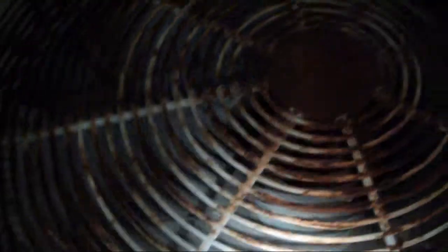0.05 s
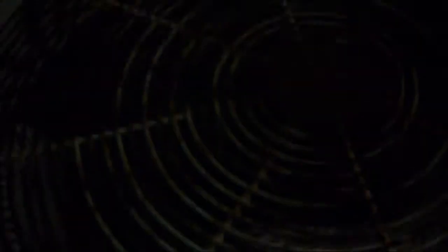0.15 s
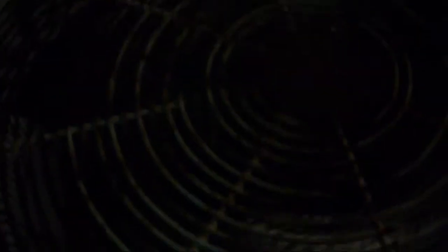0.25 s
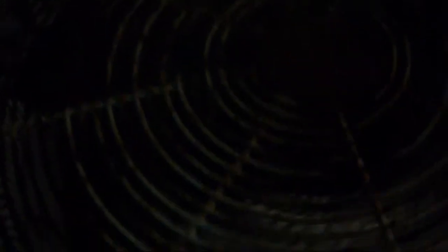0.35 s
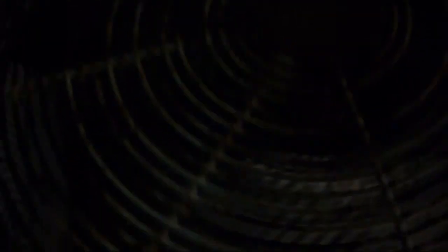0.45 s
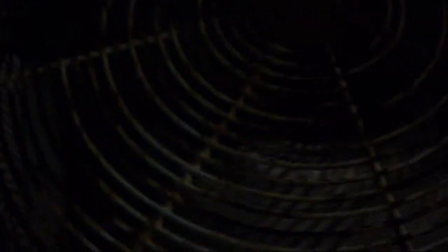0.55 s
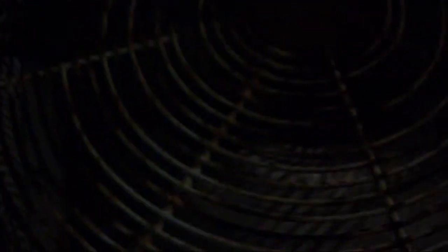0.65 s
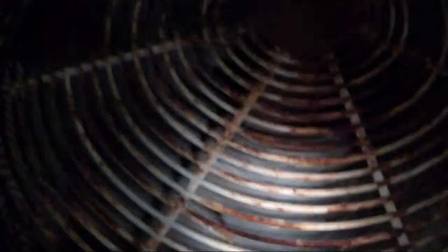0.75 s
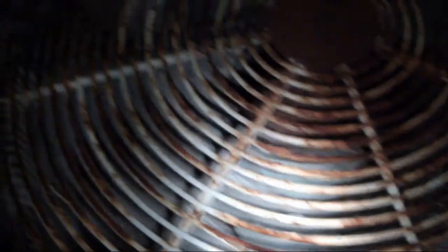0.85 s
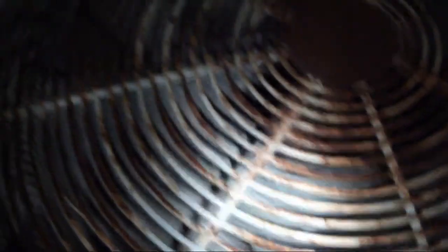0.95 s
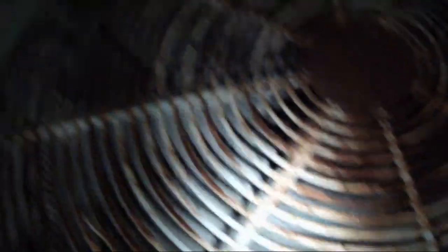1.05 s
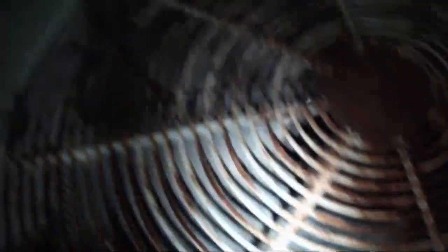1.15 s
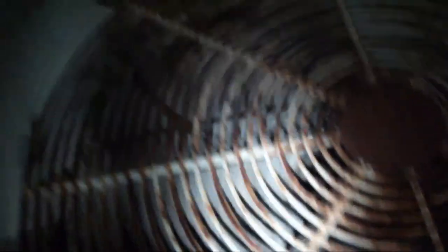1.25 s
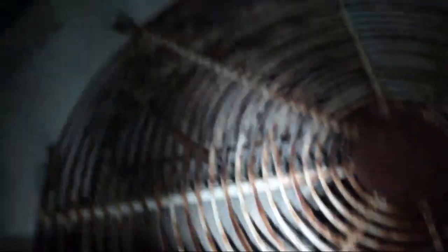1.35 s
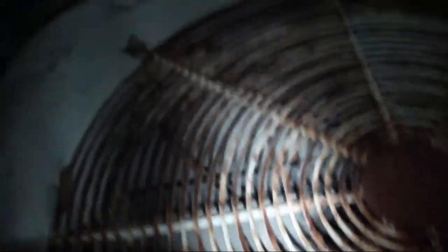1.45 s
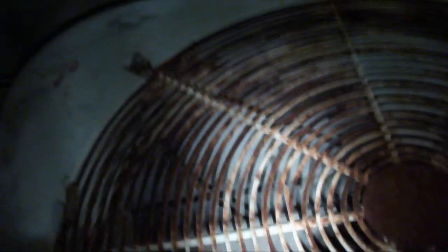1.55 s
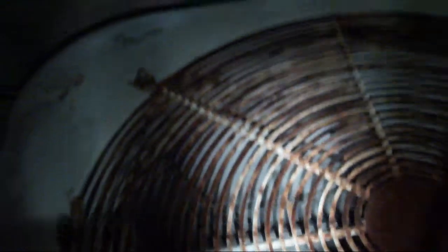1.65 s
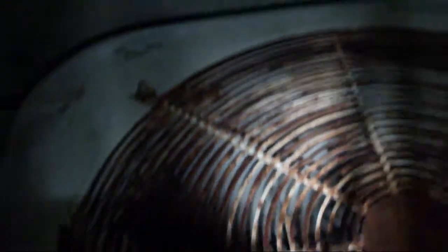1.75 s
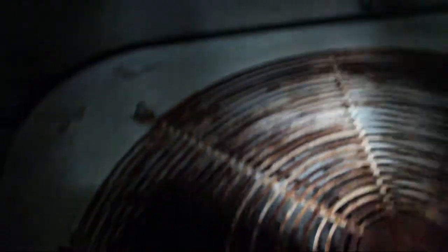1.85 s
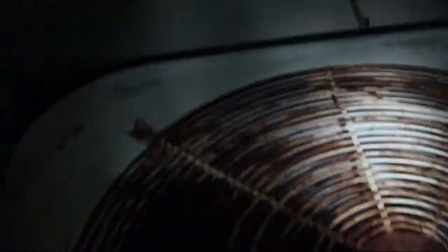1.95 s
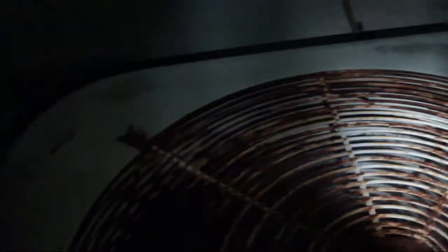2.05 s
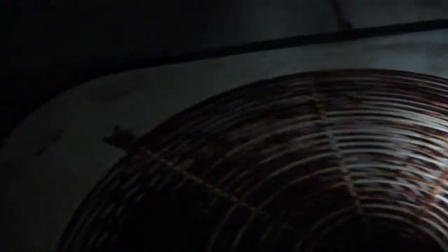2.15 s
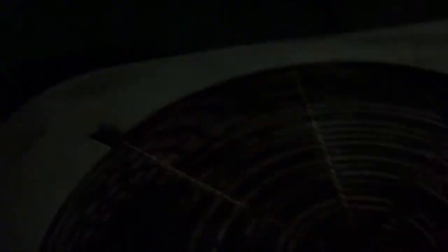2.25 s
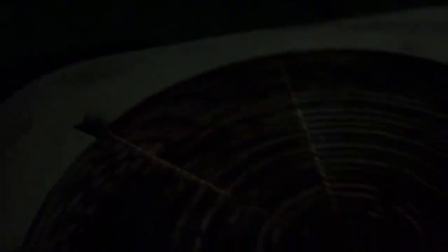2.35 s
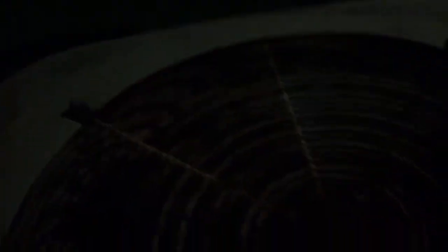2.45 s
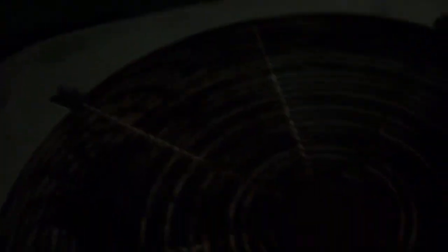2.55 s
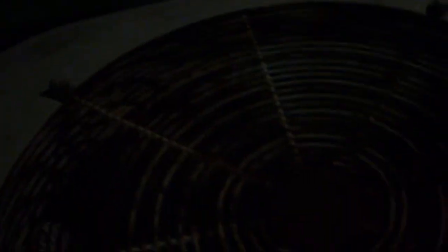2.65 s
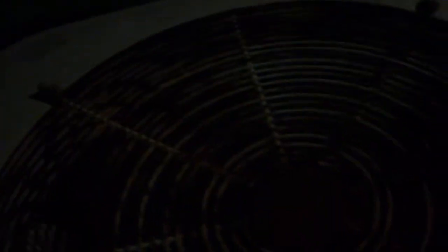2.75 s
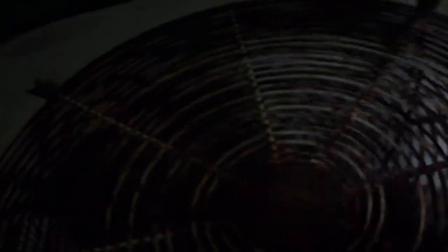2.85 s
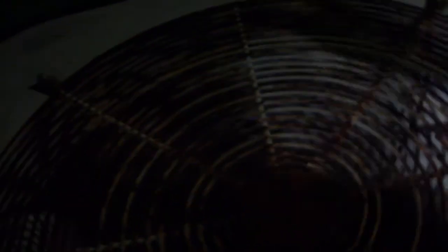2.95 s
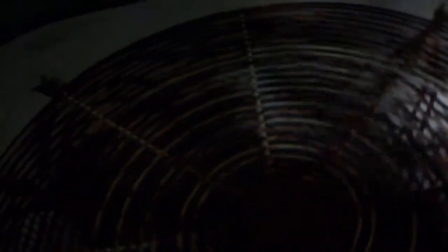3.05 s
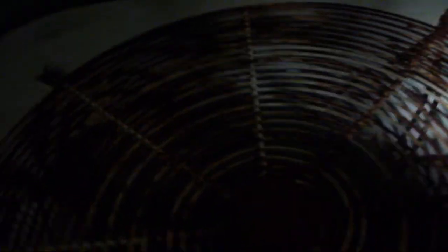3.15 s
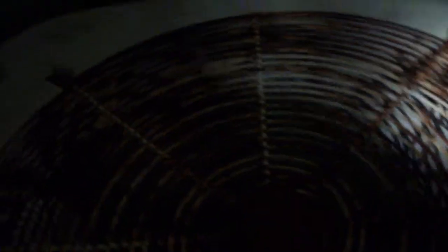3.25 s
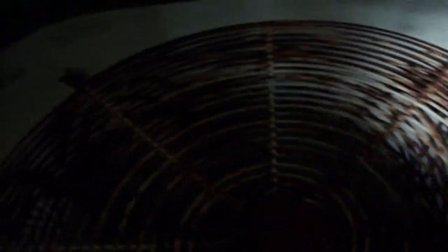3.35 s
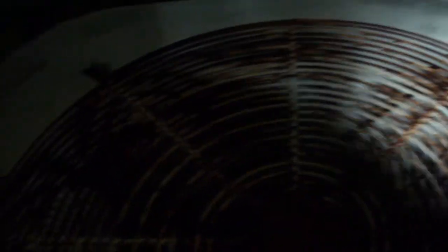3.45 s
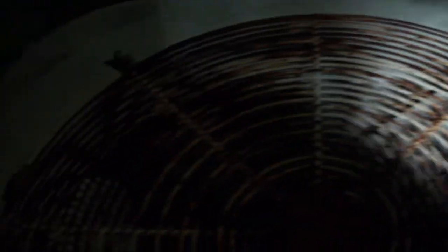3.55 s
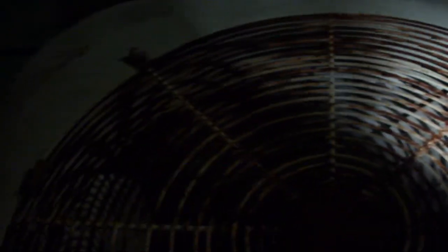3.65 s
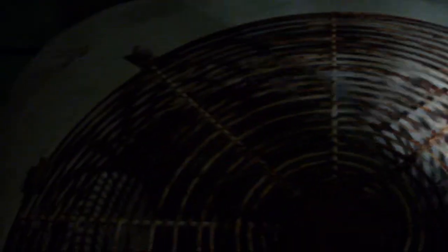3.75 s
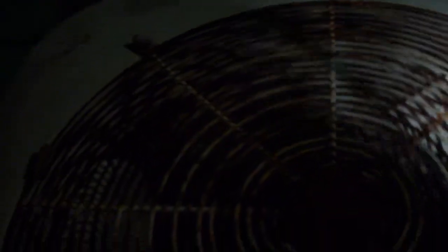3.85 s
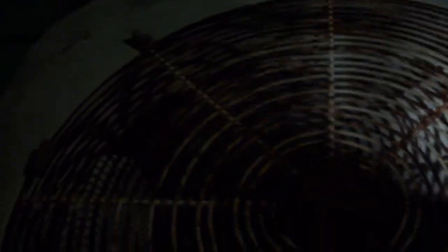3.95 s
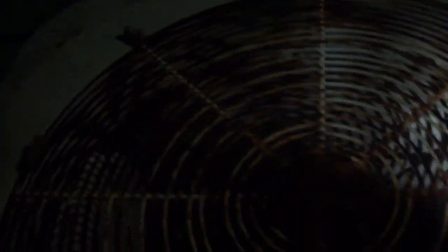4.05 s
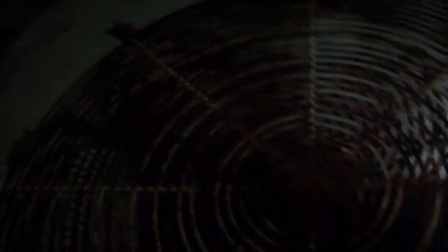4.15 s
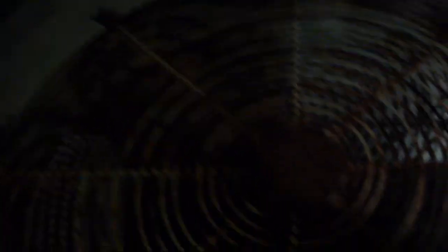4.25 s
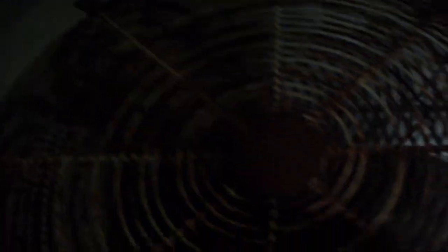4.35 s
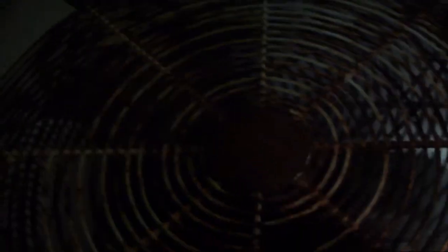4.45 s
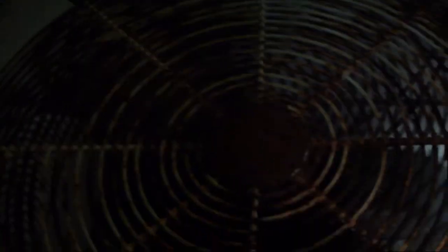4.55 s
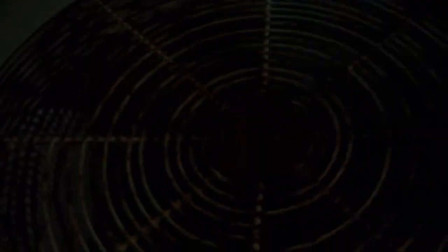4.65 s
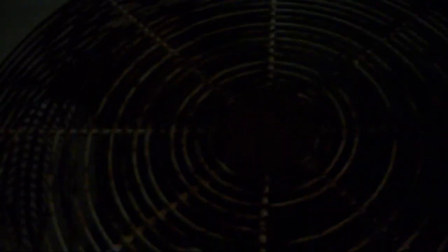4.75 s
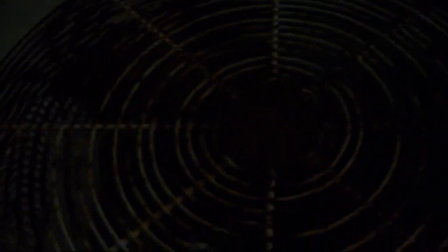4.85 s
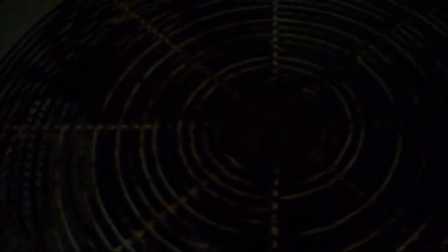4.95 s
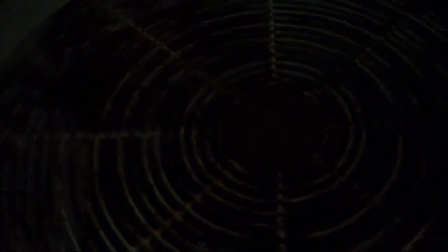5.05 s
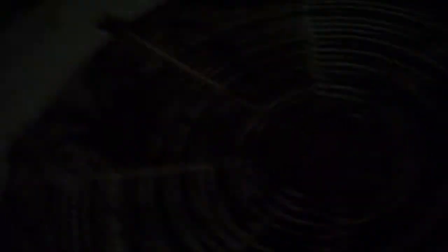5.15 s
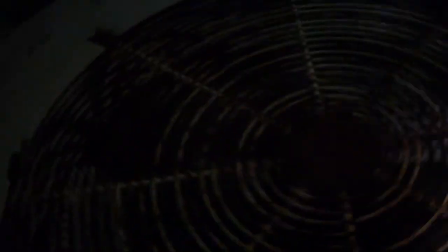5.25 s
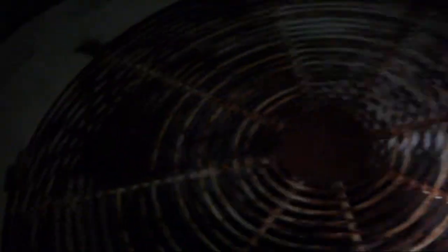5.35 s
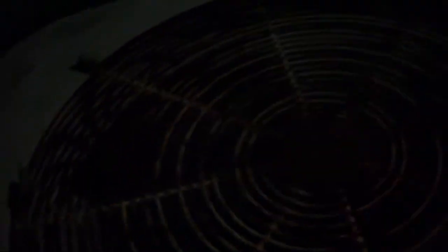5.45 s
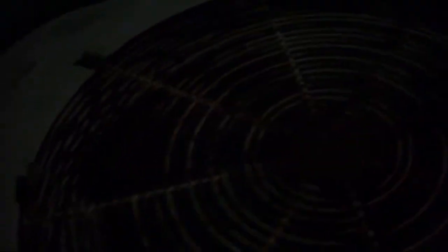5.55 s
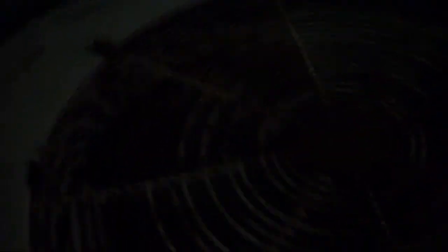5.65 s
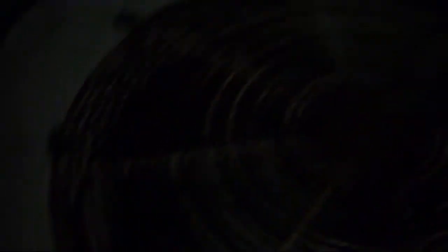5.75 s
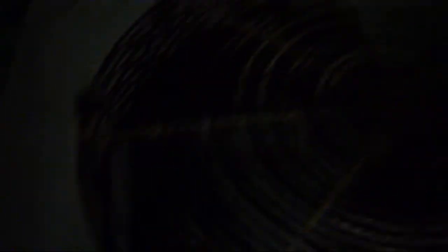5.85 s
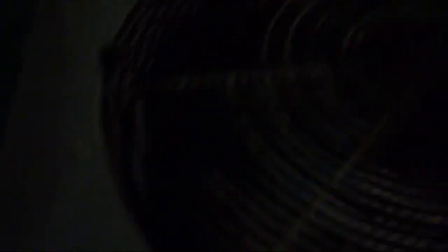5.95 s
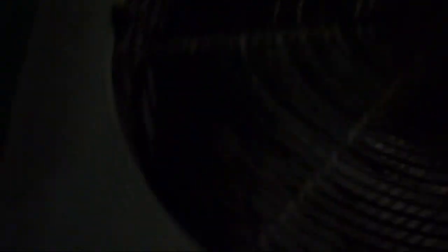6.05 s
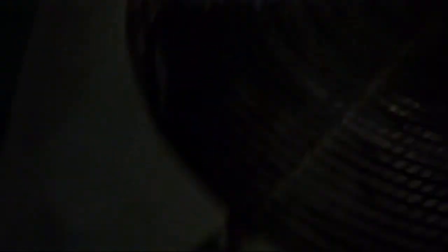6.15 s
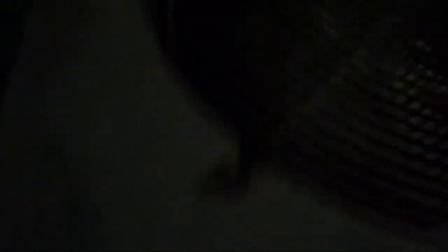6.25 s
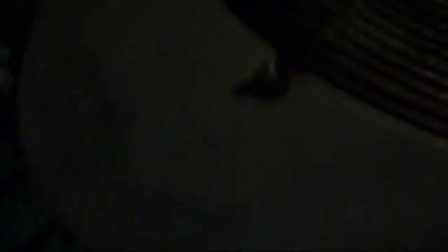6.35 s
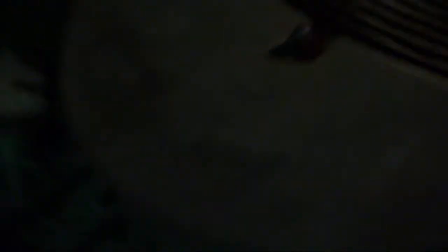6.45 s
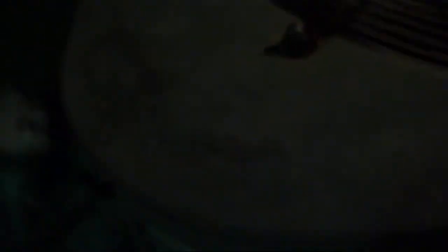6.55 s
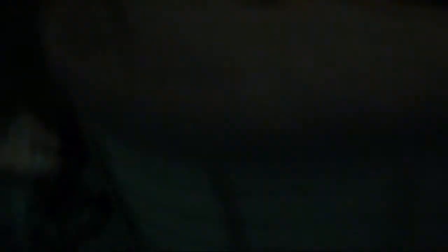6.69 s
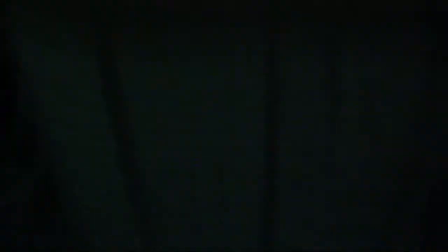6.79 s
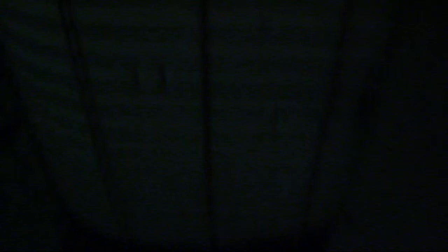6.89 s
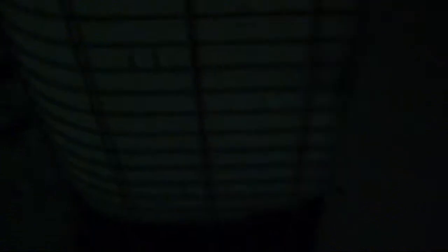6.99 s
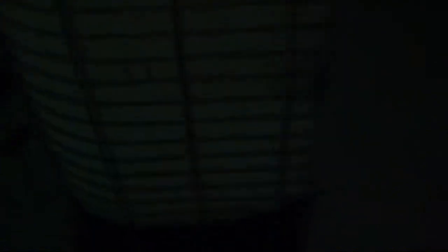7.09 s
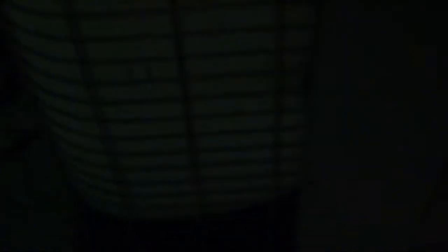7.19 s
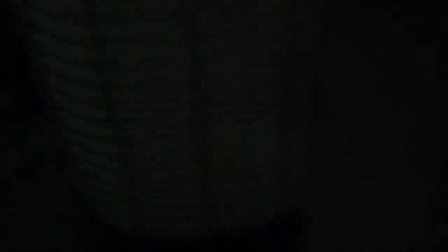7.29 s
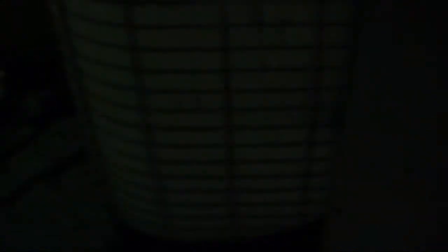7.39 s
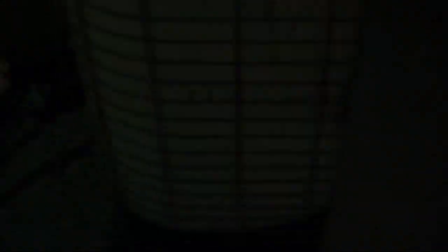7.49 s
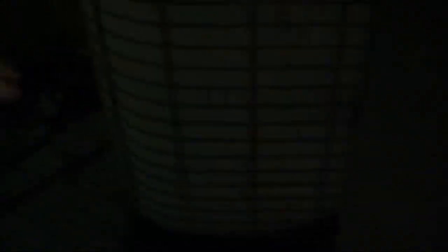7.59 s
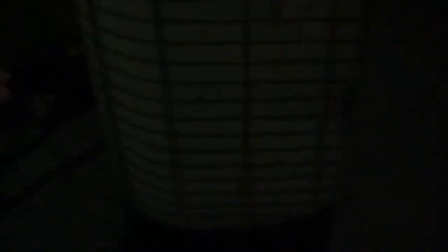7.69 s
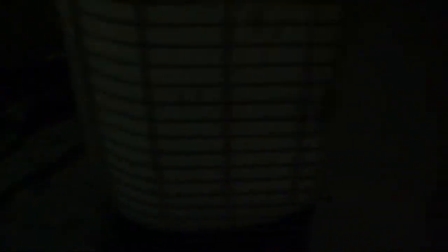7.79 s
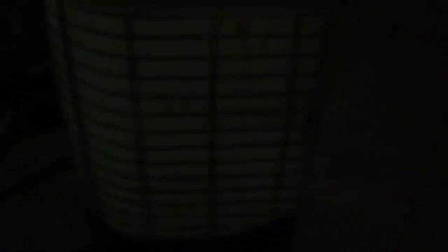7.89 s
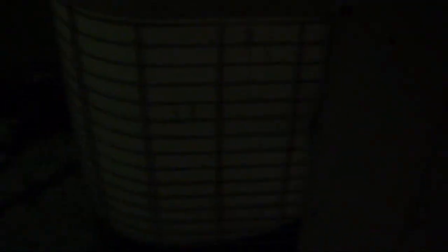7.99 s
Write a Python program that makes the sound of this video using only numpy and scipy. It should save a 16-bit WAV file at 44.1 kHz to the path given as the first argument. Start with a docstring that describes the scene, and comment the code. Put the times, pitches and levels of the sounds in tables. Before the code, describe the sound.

A heat pump runs steadily outdoors, heard just above its fan grille. From 0 to 1.6 s it is closest: deep blade throb at about 29 pulses per second, broad rushing air, and lumpy wind rumble with sharp pops and thumps, thickest between 0.2 and 1.3 s. Small ticks fall near 0.5 and 1.0 s, and a faint high squeak at the start and twice near 2.2 s. From 1.6 to 5.4 s the rush is slightly lower and bursts are sparser, over compressor hum, fine high hiss and thin steady whine. From 5.4 to 6.35 s strong buffeting returns, heaviest around 5.8 and 6.2 s. Then the microphone moves beside the cabinet; by 7 s wind and hiss have dropped, leaving softer throb, low drone and mid-pitched motor tones. Tiny ticks come at 6.7, 6.8 and 7.9 s, soft brushes near 7.5 and 7.6 s. It is still running at 8 s.

```python
"""Outdoors at a heat pump: the microphone is just above its fan grille, then beside the cabinet.
Blade pulses throb in harmonics, noise rushes at the grille, and lumpy rumble and eddy bursts buffet
the microphone until it leaves the stream. Underneath, the compressor hums in tones and droning noise
and hisses in noise with a fine comb. Steady sines whine; chirps squeak, ringing modes tick, and
shaped noise brushes twice near the end."""
import sys
import numpy as np
from scipy import signal
from scipy.fft import rfft, irfft, next_fast_len
from scipy.io import wavfile
from scipy.ndimage import uniform_filter1d, minimum_filter1d

SR = 44100
rng = np.random.default_rng(int(sys.argv[2]) if len(sys.argv) > 2 else 0)


def master(y):
    """Save y as 16-bit WAV."""
    cut = np.clip(np.atleast_2d(y).T, -1, 1)
    pcm = np.round(cut * 32767)  # scale
    wavfile.write(sys.argv[1], SR, pcm.astype(np.int16))


N = 353858

BLADE_HZ, COMPRESSOR_HZ = 28.59, 58.83
LEAVES_S, LEAVING_S = 6.15, 0.21   # centre and time constant of the move beside the cabinet
CUTOFF_HZ = 15200
TIME = np.arange(N) / SR
FREQS = np.arange(N // 2 + 1) * SR / N


def from_db(db):
    """Decibels to amplitude."""
    return 10 ** (np.asarray(db) / 20)


def rms_one(x):
    """Scales a signal to rms 1."""
    return x / np.sqrt(np.mean(x ** 2) + 1e-20)


def in_time(rows):
    """Interpolates each column of a curve, sample by sample."""
    s, *columns = np.transpose(rows)
    return [np.interp(TIME, s, c) for c in columns]


def step(s, taking_s, height=1):
    """A smooth tanh rise from nothing to its height, centred on s."""
    return height * (.5 + .5 * np.tanh((TIME - s) / taking_s))


def swell(s, half_s):
    """A bell-shaped rise and fall of height 1."""
    return np.exp(-np.minimum(((TIME - s) / half_s) ** 2, 50))


def coloured(x, spectrum):
    """Filters a signal with a spectrum joined on a log-frequency axis; rms 1."""
    size = next_fast_len(N)
    hz, db = np.transpose(spectrum)
    bins_hz = np.maximum(np.arange(size // 2 + 1) * SR / size, 1)
    gain = from_db(np.interp(np.log(bins_hz), np.log(hz), db))
    return rms_one(irfft(rfft(x, size) * gain, size)[..., :N])


def drift(rate_hz):
    """Low-passed chance with a spread of 1, made at every 40th sample."""
    r = np.exp(-80 * np.pi * rate_hz / SR)
    white = rng.standard_normal(N // 40 + 2002)
    slow = signal.lfilter([1], [1, -2 * r, r * r], white)[2000:]   # drops the settling
    return np.interp(np.arange(N) / 40, np.arange(len(slow)), rms_one(slow))


def tone(hz):
    """An rms 1 sine that starts anywhere in its cycle."""
    return np.sqrt(2) * np.sin(2 * np.pi * (hz * TIME + rng.random()))


def surge(turn, lag):
    """One short surge for each passing blade."""
    return np.cos(turn + lag) + .6 * np.cos(2 * (turn + lag))


def heard_db(level_db, close_db, screen):
    """A source is louder while the microphone starts close to the wires, and fades once screened."""
    backs_off_s, backing_off_s = 1.6, 0.26
    return level_db + close_db * (1 - step(backs_off_s, backing_off_s)) - step(*screen)


def blades(turn, level_db, waver_db, wander, lag):
    """Each blade sends a pressure wave and a sharper edge pulse; uneven inflow shakes both."""
    # throb before level_db: (time [s], fundamental [dB], octave [dB], third harmonic [dB])
    throb = [(0.2, -13.5, -18.5, -38), (0.6, -14.5, -23.5, -31), (0.92, -14, -15, -23),
             (1.32, -15.5, -18.5, -25.5), (1.8, -20, -18.5, -21), (2.32, -20.5, -19.5, -27.5),
             (2.85, -16.5, -20, -20), (3.15, -16, -18.5, -28.5), (3.6, -17.5, -23.5, -28.5),
             (4.4, -15.5, -19, -23.5), (5.1, -14, -21.5, -30), (5.72, -17.5, -24.5, -27.5),
             (6.0, -12, -18.5, -30), (6.6, -15, -23, -28), (7.1, -19.5, -24, -31.5),
             (7.55, -24.5, -28, -32.5), (7.9, -25, -28.5, -32)]
    # higher overtones: (multiple of blade rate, level against the octave [dB])
    orders = [(4, -9), (5, -20), (6, -24), (7, -20.5), (8, -25.5)]
    fundamental_db, octave_db, third_db = in_time(throb)
    edge = turn + lag + wander * drift(2.0)
    wave = from_db(fundamental_db) * np.cos(turn)
    wave = wave + from_db(octave_db) * np.cos(2 * edge)
    wave = wave + from_db(third_db) * np.cos(3 * edge)
    for k, db in orders:
        # the grille scatters the shortest waves
        scatter = 2 * np.pi * rng.random() * (round(k) > 4)
        overtone_db = octave_db + db + waver_db * drift(3)
        wave = wave + from_db(overtone_db) * np.cos(round(k) * edge + scatter)
    return np.sqrt(2) * from_db(level_db) * wave


def air_stream():
    """Strength in dB of the stream at the microphone: slow changes, gusts and the cabinet's screening."""
    # slow strength before gusts and screening: (time [s], level [dB])
    strength = [(0.0, -25.5), (0.15, -22), (0.69, -22), (1.87, -23.5), (3.4, -25), (4.6, -23.5),
                (5.85, -23), (6.21, -23), (6.75, -28.5), (8.02, -33.5)]
    # gusts: (time [s], half length [s], rise [dB])
    gusts = [(.52, 0.099, 3), (0.772, 0.025, 3), (1.106, 0.064, 3.5), (5.523, 0.057, 4.5),
             (5.744, 0.054, 4), (5.932, 0.036, 1.5), (6.247, 0.03, 7), (6.313, 0.027, 3)]
    # cabinet screening: (time [s], time constant [s], loss [dB])
    wind_screen = (6.55, 0.25, 5)
    gust_db = sum(db * swell(s, half_s) for s, half_s, db in gusts)
    return in_time(strength)[0] + gust_db - step(*wind_screen)


def buffeting(turn, stream_db, level_db, lumpy_db, lumps_per_db, beat_db, sub_db):
    """Turbulence on the microphone: rumble whose upper part is lumpy, rougher in a stronger stream."""
    # turbulence colour: (frequency [Hz], relative density [dB per Hz])
    buffet = [(6, 2), (14, 0.5), (42, 4), (70, 1.5), (100, 1.5), (125, -2), (170, -3), (250, -6),
              (330, -9.5), (500, -10.5), (750, -16), (1100, -20.5), (1800, -28), (2600, -56), (5000, -58.5)]
    excess_db = stream_db - np.median(stream_db)
    air = coloured(rng.standard_normal(N), buffet)
    band = signal.butter(2, [130, 1200], "band", fs=SR, output="sos")
    air /= np.std(signal.sosfilt(band, air))
    large = signal.sosfiltfilt(signal.butter(2, 220, fs=SR, output="sos"), air)
    depth_db = np.clip(lumpy_db + lumps_per_db * excess_db, 0, 4.5)
    chance = np.clip(drift(80), -2.5, 1.8)
    lumps = from_db(depth_db * chance + beat_db * surge(turn, lag=2.5))
    lumps /= np.sqrt(uniform_filter1d(lumps ** 2, size=6000))   # keeps the running level even
    return from_db(level_db + stream_db) * (from_db(sub_db) * large + lumps * (air - large))


def air_rush(turn, beat_db, flutter_db, apart):
    """Air torn by the grille wires: noise swelling a little with each blade."""
    # cabinet screening: (time [s], time constant [s], loss [dB])
    rush_screen = (6.82, 0.084, 5.7)
    # rush colour: (frequency [Hz], relative density [dB per Hz])
    colour = [(150, -10.5), (420, 1.5), (550, -1.5), (740, 0), (1100, -2.5), (1450, -8.5), (1850, -6),
              (2400, -12.5), (2900, -14), (3500, -19.5), (6000, -31.5), (10000, -32.5), (15000, -46)]
    rush_db = heard_db(level_db=-34.0, close_db=2.0, screen=rush_screen)
    white = rng.standard_normal(N) + apart * rng.standard_normal((2, N))
    moving_db = rush_db + beat_db * surge(turn, lag=1.5) + flutter_db * drift(27)
    return from_db(moving_db) * coloured(white, colour)


def compressor_hiss(turn, hiss_db, repeating, beat_db, apart):
    """Gas hiss, part repeating with each stroke as a fine comb of lines; the blades chop it."""
    # hiss colour: (frequency [Hz], relative density [dB per Hz])
    colour = [(2500, -34), (3500, -6), (4000, 1.5), (4500, 1), (5100, -3), (5900, -1), (6450, -1),
              (7100, -1), (7600, -5), (8600, -3), (9700, -10), (10200, -14.5), (11500, -13.5), (15000, -36)]
    period = SR / COMPRESSOR_HZ
    comb = np.zeros(N // 2 + 1, complex)
    lines = np.arange(1, int(period / 2)) * N / period
    comb[np.round(lines).astype(int)] = np.exp(2j * np.pi * rng.random(len(lines)))
    white = rng.standard_normal(N) + repeating * rms_one(irfft(comb, N))
    white = white + apart * rng.standard_normal((2, N))
    return from_db(hiss_db + beat_db * surge(turn, lag=-1.9)) * coloured(white, colour)


def whistles(hiss_db, waver_db):
    """Narrow pipe resonances in the hiss come and go, until the cabinet screens them."""
    # (centre [Hz], width [Hz], mean level against the hiss [dB], middle of fade-out [s])
    resonances = [(4450, 220, -14, 5.9), (6400, 200, -9.5, 5.95), (10200, 250, -17, 6.45)]
    out = 0
    for hz, width_hz, db, until_s in resonances:
        band = signal.lfilter(*signal.iirpeak(hz, hz / width_hz, fs=SR), rng.standard_normal(N))
        band = signal.lfilter(*signal.iirpeak(hz, hz / width_hz / 2, fs=SR), band)
        level = from_db(hiss_db + db + waver_db * drift(3.1))
        out = out + level * (1 - step(until_s, LEAVING_S)) * rms_one(band)
    return out


def compressor_hum(beside, drone_db, waver_db):
    """The cabinet panels drone, and single tones change as the microphone moves round them."""
    # tones before wavering: (frequency [Hz], over the grille [dB], beside the cabinet [dB])
    hum = [(235.3, -39.5, -39.5), (352.9, -51, -47), (1765, -55.5, -64), (2706, -65, -72), (2764, -68, -69),
           (2882, -69, -72), (3882, -70, -78), (4471, -65.5, -80), (4942, -69, -78), (5001, -70, -80),
           (5119, -71, -80), (6357, -64, -80), (6413, -66, -80), (8942, -73, -82), (9236, -74, -82)]
    # the two motor tones: (lower [Hz], upper [Hz])
    motor_hz = (1294, 1333)
    # they trade places as the microphone moves: (time [s], lower level [dB], upper level [dB])
    motor = [(0, -50, -57), (2.8, -52, -52), (4.1, -51, -59), (4.6, -57, -50.5), (6.3, -59, -54),
             (6.75, -60, -50), (6.97, -59, -48.5), (7.15, -52, -51), (7.45, -50.5, -51), (8.02, -53, -53)]
    # panel drone colour: (frequency [Hz], relative density [dB per Hz])
    cabinet = [(30, -12), (70, -1.5), (105, 1.5), (135, -3.5), (170, 0), (205, -3.5), (300, -3.5),
               (360, -18.5), (600, -37), (1500, -32), (2100, -43), (2900, -30.5), (4200, -46)]
    tones = 0
    for hz, over_db, side_db in hum:
        moving_db = over_db + (side_db - over_db) * beside + waver_db * drift(2.6)
        tones = tones + from_db(moving_db) * tone(hz)
    singing = sum(from_db(db) * tone(hz) for hz, db in zip(motor_hz, in_time(motor)))
    drone = from_db(drone_db) * coloured(rng.standard_normal(N), cabinet)
    return tones + singing + drone


def electric_whine():
    """Steady thin electric tones, each a plain sine."""
    # (frequency [Hz], level [dB])
    lines = [(7143, -67), (7197, -67), (7440, -58), (7753, -74), (14880, -63)]
    return sum(from_db(db) * tone(hz) for hz, db in lines)


def squeaks():
    """Brief thin tones that swell and fade."""
    # (time [s], frequency [Hz], half length [s], level [dB])
    chirps = [(0.03, 3900, 0.02, -44.5), (2.19, 4020, .014, -46), (2.265, 4000, .017, -47)]
    return sum(from_db(db) * swell(s, half_s) * tone(hz) for s, hz, half_s, db in chirps)


def small_pops(stream_db, spread_db, count):
    """Weaker eddies come at random and grow with the stream; rows like those of strong eddies."""
    pops_per_s, over_stream_db, swing_s, wake_s = 5, 3, 0.00039, 0.0084
    wait, strength = rng.random((count, 2)).T
    times = np.cumsum(-np.log(1 - wait)) / pops_per_s
    peaks_db = np.interp(times, TIME, stream_db) + over_stream_db + spread_db * (2 * strength - 1)
    return [(s, db, swing_s, db, wake_s) for s, db in zip(times, peaks_db)]


def swing(u):
    """Pressure goes up and then down, to a height of 1."""
    return -16 / 3 ** 1.5 * u / (1 + u * u) ** 2


def pops(stream_db, thump_s, wake_db, suction):
    """A bursting eddy swings pressure inside a slower thump that sucks more, and leaves a ragged wake."""
    # strong eddies before the low-pass:
    # (onset [s], swing peak [dB], swing time [s], thump [dB], wake decay [s])
    strong = [(0.2445, -13, 0.00047, -18, .004), (0.436, -12, 0.00067, -19, .018),
              (0.533, -13, .0006, -20, .014), (0.603, -9.5, 0.00064, -15, 0.0081),
              (0.733, -6.5, 0.00038, -18, .005), (0.8125, -13, 0.00041, -4, 0.0034),
              (0.870, -16, .00025, -20, .003), (0.921, -23, .0005, -22, .008),
              (0.959, -13, 0.0004, -21, .005), (0.972, -9, 0.00033, -9, .014),
              (1.121, -17, .0007, -8, .008), (1.254, -12, .00024, -23, .003),
              (1.2825, -9, 0.00044, -18, 0.0035), (1.547, -14, 0.00055, -19, .008),
              (2.109, -14, 0.00068, -15, .005), (2.851, -14, 0.00034, -22, .004),
              (3.170, -14, .00045, -22, .005), (4.364, -15.5, 0.00048, -26, .004),
              (5.4425, -17, 0.00069, -17, .005), (5.503, -14, .00044, -25, .014),
              (5.719, -12, 0.00055, -13, 0.0066), (5.759, -19, 0.00057, -15, 0.0072),
              (5.788, -3, 0.00042, -6, 0.0038), (5.830, -17, 0.00035, -19, 0.0067),
              (5.843, -5.5, 0.00045, -9, 0.0065), (5.8975, -20, 0.00065, -5.5, .002),
              (5.9195, -11, 0.00042, -12, 0.0056), (5.956, -20, .0006, -7, .007),
              (6.025, -15, 0.00067, -20, 0.0068), (6.107, -13, 0.00055, -7, 0.0046),
              (6.132, -16, .0003, -24, .01), (6.147, -12, 0.00044, -19, .004),
              (6.228, -6, 0.00049, -15, 0.01), (6.242, -13, .00048, -14, 0.013),
              (6.268, -12.5, 0.00031, -7, .004), (6.332, -15, .0006, -17, .004)]
    rise_s = 0.0025   # onset to middle of swing
    out, wake = np.zeros((2, N))
    for s, db, swing_s, thump_db, wake_s in list(strong) + small_pops(stream_db, spread_db=4, count=80):
        near = slice(*np.searchsorted(TIME, [s - .03, s + .06]))
        age = TIME[near] - s - rise_s
        thump = swing(age / thump_s)
        out[near] += from_db(db) * swing(age / swing_s)
        out[near] += from_db(thump_db) * (thump - suction * thump ** 2)
        wake[near] += from_db(db + wake_db) * (age > 0) * np.exp(-np.abs(age) / wake_s)
    band = signal.butter(1, [200, 650], "band", fs=SR, output="sos")
    ragged = rms_one(signal.sosfilt(band, rng.standard_normal(N)))
    return signal.sosfilt(signal.butter(6, 2600, fs=SR, output="sos"), out + wake * ragged)


def ticks(ring_s, snap_s):
    """Tiny hard contacts, each a snap that sets the same few modes ringing briefly."""
    # (time [s], ring [dB], snap [dB])
    contacts = [(0.5062, -15, -24), (1.008, -21.5, -31), (5.5476, -32, -36), (5.718, -25, -21.5),
                (6.7005, -37, -50), (6.8195, -27, -35), (7.8735, -38, -48)]
    # ringing modes: (frequency [Hz], level against the ring [dB])
    mode_table = [(2800, -9), (3350, -15), (4650, -12), (5330, -5), (6650, 0), (7100, -2), (7950, -4),
                  (9200, -17), (9900, -19)]
    # snap colour: (frequency [Hz], relative density [dB per Hz])
    snap_colour = [(1500, -10), (4000, -7), (5200, -1), (8000, 0), (10300, 1.5), (11300, -8), (14000, -16)]
    ring, snap = np.zeros((2, N))
    age = TIME[:SR // 20]
    modes = 0
    for k, (hz, db) in enumerate(mode_table):
        modes = modes + (-1) ** k * from_db(db) * np.sin(2 * np.pi * hz * age)
    for s, ring_db, snap_db in contacts:
        span = slice(round(s * SR), round(s * SR) + len(age))
        ring[span] += from_db(ring_db) * np.exp(-age / ring_s) * modes
        snap[span] += from_db(snap_db) * np.exp(-age / snap_s)
    return ring + snap * coloured(rng.standard_normal(N), snap_colour)


def brushes():
    """Soft, short rustles of shaped noise."""
    # (time [s], half length [s], level [dB])
    rustles = [(7.468, .02, -48), (7.587, .03, -45.5)]
    # colour: (frequency [Hz], relative density [dB per Hz])
    colour = [(1500, -3), (4000, -1), (6000, 0), (8000, -5), (10500, -12), (14000, -24)]
    level = sum(from_db(db) / (1 + ((TIME - s) / half_s) ** 4) for s, half_s, db in rustles)
    return level * coloured(rng.standard_normal(N), colour)


def two_ports(x, shared_hz):
    """Treble reaches the left port one sample after the right; the bass presses on both alike."""
    half_sample = np.tan(np.pi * np.minimum(FREQS, CUTOFF_HZ) / SR)
    side = 1j * half_sample * FREQS / np.hypot(FREQS, shared_hz)
    return irfft(rfft(x) * np.array([1 - side, 1 + side]), N)


def scene():
    """Fan, air and compressor, all close to the microphone."""
    # cabinet screening of the hiss: (time [s], time constant [s], loss [dB])
    hiss_screen = (6.46, 0.56, 7.2)
    turn = 2 * np.pi * BLADE_HZ * TIME + 0.12 * drift(0.38)   # one cycle per blade
    beside = step(LEAVES_S, LEAVING_S)
    stream_db = air_stream()
    hiss_db = heard_db(level_db=-46.0, close_db=0.5, screen=hiss_screen)
    fan = blades(turn, level_db=-0.5, waver_db=3.5, wander=0.063, lag=1.796)
    wind = buffeting(turn, stream_db, level_db=-0.57, lumpy_db=2.3, lumps_per_db=.15,
                     beat_db=0.75, sub_db=-0.5)
    rush = air_rush(turn, beat_db=1.33, flutter_db=0.9, apart=0.0028)
    hiss = compressor_hiss(turn, hiss_db, repeating=0.46, beat_db=1.4, apart=0.49)
    hiss = hiss + whistles(hiss_db, waver_db=1.6)
    hum = compressor_hum(beside, drone_db=-30.5, waver_db=2.5)
    bursts = pops(stream_db, thump_s=0.0017, wake_db=-13.5, suction=0.24)
    clicks = ticks(ring_s=.001, snap_s=.001)
    machine = fan + rush + hiss + hum + electric_whine()
    return two_ports(machine + wind + bursts + squeaks() + clicks + brushes(), shared_hz=1510)


def record(dry):
    """A fast look-ahead limiter turns down peaks over full scale, then the top is cut."""
    allowed = minimum_filter1d(1 / np.maximum(np.abs(dry).max(axis=0), 1), size=260)
    gain = uniform_filter1d(uniform_filter1d(allowed, size=130), size=130)
    top_cut = signal.ellip(10, .1, 90, CUTOFF_HZ, fs=SR, output="sos")
    return signal.sosfilt(top_cut, gain * dry)


dry = scene()
out = record(dry)
master(out)
```